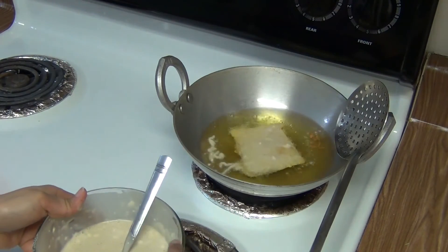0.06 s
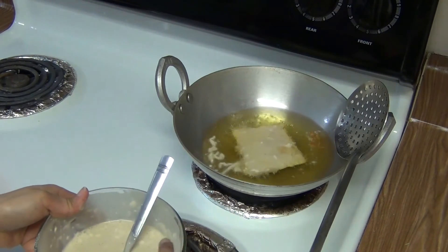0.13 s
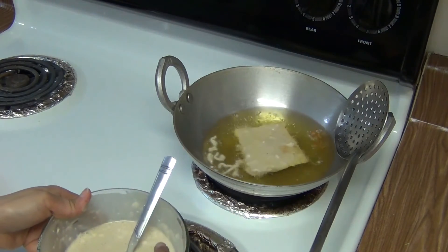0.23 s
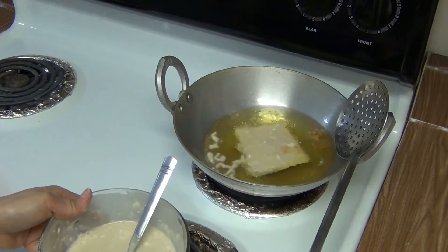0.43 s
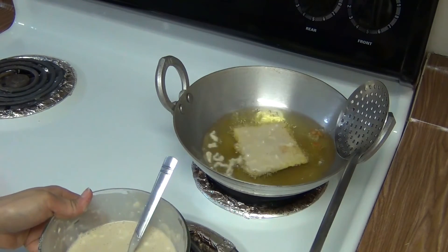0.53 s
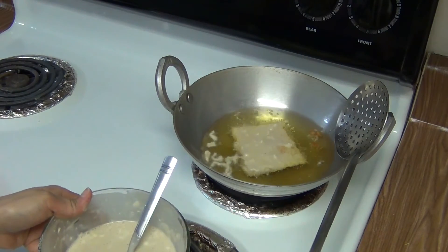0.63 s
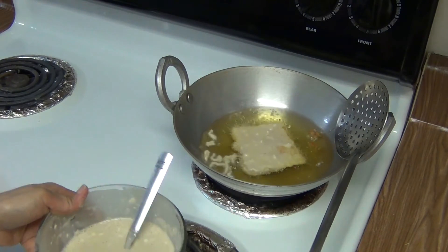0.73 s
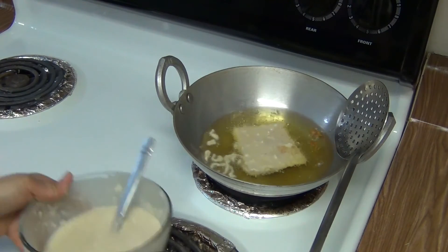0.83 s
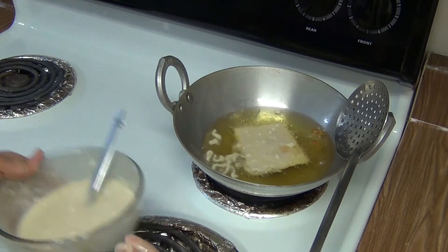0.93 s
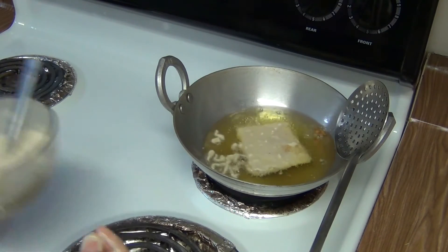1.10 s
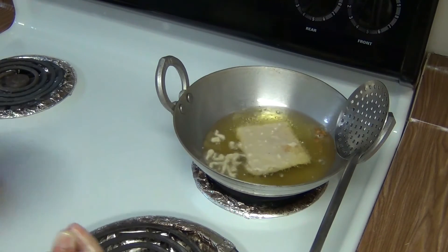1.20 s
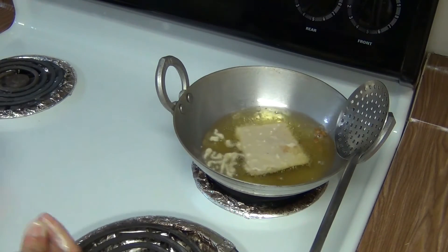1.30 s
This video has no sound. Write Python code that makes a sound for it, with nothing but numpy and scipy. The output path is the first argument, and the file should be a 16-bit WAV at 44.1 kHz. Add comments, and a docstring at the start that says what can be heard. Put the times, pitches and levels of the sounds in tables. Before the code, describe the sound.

In a small kitchen, hot oil fizzes and bubbles softly around frying food near the microphone. A utensil clatters quickly against a dish, louder than the oil, then the sizzle continues with faint bumps and one sharper pop.

```python
"""A thin fizz of bursting bubbles over a low, simmering rumble: battered food is frying in hot oil.
Bigger bubbles spit, steam gurgles out from under the food, and handling makes faint bumps.
Early on, a utensil knocks and rattles against a dish, and the dish and the small kitchen ring.
A noise suppressor turns the middle pitches down whenever they are quiet."""
import sys
import numpy as np
from scipy.fft import rfft, irfft
from scipy.io import wavfile
from scipy.ndimage import uniform_filter1d

SR = 44100
rng = np.random.default_rng(int(sys.argv[2]) if len(sys.argv) > 2 else 0)


def store_wav(level_fs):
    """Save 16-bit WAV to argv[1]."""
    pcm = np.round(np.clip(np.atleast_2d(level_fs), -1, 1) * 32767)
    wavfile.write(sys.argv[1], SR, pcm.T.astype(np.int16))


N = 59535
T = np.arange(N) / SR
HZ = np.maximum(np.arange(N + 1) * SR / (2 * N), 1)

# Levels in dB are relative: later gains shift them. A fade time (T60) is the time to drop 60 dB.
# How hard the oil fizzes. Each row: time in seconds, level in dB.
SIZZLE_LEVEL = [(0, -48), (.13, -48.5), (.21, -45.5), (.55, -51), (.72, -50), (1.03, -50), (1.12, -46.5),
                (1.35, -45.5)]
# Tone of bursting bubbles. Each row: frequency in Hz, level in dB.
BUBBLE_TONE = [(4400, -60), (5100, -23), (5450, -24), (6250, -9), (7000, -5), (7900, 0), (8800, -6),
               (9500, -16), (10200, -16), (10900, -36), (12300, -50.5), (14000, -69.5)]
# How strongly the oil rumbles. Each row: time in seconds, level in dB.
SIMMER_LEVEL = [(0, -58), (.12, -55.5), (.2, -59.5), (.56, -55), (.6, -55.5), (.64, -55), (.68, -62),
                (.735, -58.5), (.8, -60.5), (.88, -57.5), (1.09, -57), (1.22, -54.5), (1.35, -53.5)]
# Tone of that rumble. Each row: frequency in Hz, level in dB.
SIMMER_TONE = [(25, -27.5), (70, -19.5), (120, -9), (170, -12), (230, -2.5), (310, -3.5), (380, -2),
               (470, -1.5), (650, -9.5), (820, -15), (1050, -22.5), (1500, -30), (2200, -50)]
# Louder spits of oil. Each row: start in seconds, level in dB, pitch in Hz.
SPITS = [(.0125, -37, 7520), (0.0432, -34, 7160), (0.1543, -28, 7800), (.176, -33.5, 9030),
         (.4705, -32, 8000), (.799, -33.5, 7800), (1.0857, -19, 8250), (1.0906, -29, 8392),
         (1.1997, -34, 7900)]
# Gurgles in the hollow of the pan. Each row: loudest moment in seconds, level in dB, pitch in Hz.
GURGLES = [(0.12, -52.5, 313.4), (.49, -52, 314.4), (.64, -53.5, 302), (.865, -55, 328), (.975, -52.5, 318),
           (1.05, -56, 320), (1.195, -50, 307.5), (1.254, -50, 298)]
# Soft bumps. Each row: start in seconds, thud level in dB, tap level in dB.
BUMPS = [(.165, -54, -68), (.618, -70, -84.5), (.852, -54, -79), (.895, -60.5, -54.5), (1.191, -59, -71.5),
         (1.315, -69, -54.5)]
# Tones of a bump's thud and tap. Each row: frequency in Hz, level in dB.
THUD_TONE = [(25, -6.5), (70, -9.5), (125, 4.5), (200, -16.5), (500, -27.5), (1500, -63)]
TAP_TONE = [(100, -26.5), (400, 2), (900, 2.5), (1300, -5), (2200, -22.5), (5000, -57.5)]
# Utensil hits. Each row: start in seconds, crack level in dB, ring level in dB, crack hold in seconds.
KNOCKS = [(0.2367, -20, -36, 0.0059), (0.2485, -18, -34, 0.0043), (0.2556, -19, -36, 0.0051),
          (0.2791, -17, -32.5, 0.006), (.3608, -32.5, -37.5, 0.0036), (0.401, -43, -44, 0.0046)]
# Tones of a hit's crack and of the dense ringing after it. Each row: frequency in Hz, level in dB.
CRACK_TONE = [(40, -28), (200, -15), (400, -10), (650, -8.5), (900, -4), (1300, -15.5), (2500, -21),
              (4700, -16), (6200, -6.5), (8000, 3), (8900, -2.5), (9500, -10.5), (10100, -9.5),
              (10800, -25.5), (12300, -26.5), (13000, -55), (15500, -64.5)]
ROOM_RING_TONE = [(30, -19), (120, -2.5), (250, -2), (450, -2), (900, 1), (1250, -0.5), (1900, 4),
                  (3000, 2.5), (5000, -3), (7800, 2), (9800, -9), (11000, -21.5), (12500, -26.5),
                  (15000, -45)]
# The dish's own notes. Each row: pitch in Hz, level in dB, fade time in seconds.
DISH_NOTES = [(376, -2, 0.29), (516, 2.5, 0.25), (850, -6, 0.26), (1850, 1.5, 0.32), (2236, -11, 0.3),
              (2256, -12, 0.32), (2415, -7.5, 0.34), (2547, -4.5, 0.25), (2714, -9, .5), (3430, -15, .5),
              (3952, -10, 0.495), (4335, -14.5, 0.493), (5530, -8, 0.326), (5880, -3, 0.24),
              (6310, -7, 0.36), (6984, -2.5, 0.24), (7386, 4, .28), (7920, -6, .4), (8770, -3.5, 0.296),
              (8490, -11, .25)]
# How long the kitchen echoes. Each row: frequency in Hz, fade time in seconds.
KITCHEN_FADE = [(60, 0.86), (250, 0.58), (600, .55), (2500, 0.4), (8000, 0.44), (14000, 0.33)]
# Stereo width. Each row: frequency in Hz, level of the sides against the middle in dB.
STEREO_WIDTH = [(30, -7.5), (70, -8.5), (140, -11.5), (300, -17.5), (700, -19), (1500, -21.5),
                (3500, -23.5), (5500, -12.5), (7000, -15), (8500, -17.5), (11000, -37)]
# Added lean to the left. Each row: frequency in Hz, left level against right in dB.
LEFT_LEAN = [(30, -2.5), (80, 10.5), (150, 9), (300, 3), (600, -2), (1500, -0.7), (12000, -0.25)]
# The suppressor's deepest cut. Each row: frequency in Hz, gain in dB.
DEEPEST_CUT = [(800, -1), (1300, -20), (1850, -29), (4400, -43), (4900, -27.5), (5350, -0.5)]
# Tone of a very faint hiss. Each row: frequency in Hz, level in dB.
HISS_TONE = [(1000, -0.5), (5000, 4), (10000, -7.5), (13000, -16)]


def from_db(db):
    """Turn decibels into a number to multiply by."""
    return 10 ** (np.asarray(db) / 20)


def unit_power(x):
    """Scale a signal to an average power of 1."""
    return x / np.sqrt(np.mean(x ** 2) + 1e-20)


def over_time(rows):
    """Join (time, value) rows with straight lines."""
    return np.interp(T, *np.transpose(rows))


def at_hz(rows, hz):
    """Read between (frequency, value) rows, with octaves evenly spaced."""
    frequencies, values = np.transpose(rows)
    return np.interp(np.log(hz), np.log(frequencies), values)


def filtered(x, response):
    """Turn each frequency up or down."""
    return irfft(rfft(x, 2 * N) * response)[..., :N]


def with_tone(x, tone):
    """Shape a sound with a tone table; white noise keeps its power."""
    cepstrum = irfft(np.log(unit_power(from_db(at_hz(tone, HZ)))))
    # Minimum phase: the filter rings only after a sound, never before it.
    cepstrum[1:N] *= 2
    cepstrum[N + 1:] = 0
    return filtered(x, np.exp(rfft(cepstrum)))


def drift(rate_hz):
    """A smooth random wobble, about 1 in size."""
    return unit_power(filtered(rng.standard_normal(N), 1 / (1 + (HZ / rate_hz) ** 2)))


def pan(left_db):
    """Left and right gains; negative values move the sound right."""
    return from_db(np.array([[.5], [-.5]]) * left_db)


def stereo(pair):
    """Use two unrelated signals as the middle and sides of a narrow stereo sound."""
    side = filtered(pair[1], from_db(at_hz(STEREO_WIDTH, HZ)))
    return np.array([pair[0] + side, pair[0] - side])


def kitchen_echo():
    """Many reflections blur together, each octave fading at its own rate."""
    noise, echo = rng.standard_normal((2, N)), 0
    for hz in 2. ** np.arange(5, 15):
        octave = filtered(noise, np.maximum(1 - abs(np.log2(HZ / hz)), 0))
        echo += octave * from_db(-60 * T / at_hz(KITCHEN_FADE, hz))
    return stereo(echo)


def in_kitchen(x, echo_db):
    """The direct sound plus the room's echo."""
    echo = unit_power(kitchen_echo()) / np.sqrt(N)
    return x + from_db(echo_db) * filtered(x, rfft(echo, 2 * N))


def sizzle(bursts_per_s=6400, spread_db=3.5, flutter_db=0.63):
    """Thousands of tiny steam bubbles burst at random, most weak and a few strong."""
    sizes = from_db(spread_db * np.minimum(rng.exponential(1, (2, N)), 5))
    signs = rng.choice([-1, 1], (2, N))
    bursting = rng.random((2, N)) < bursts_per_s / SR
    bursts = stereo(with_tone(sizes * signs * bursting, BUBBLE_TONE))
    fizz = unit_power(in_kitchen(bursts, echo_db=-7))
    return fizz * from_db(over_time(SIZZLE_LEVEL) + flutter_db * drift(23))


def simmer(boost_db=1.5, flutter_db=0.5):
    """Churning oil makes a low, uneven rumble."""
    rumble = unit_power(stereo(with_tone(rng.standard_normal((2, N)), SIMMER_TONE)))
    return rumble * from_db(boost_db + over_time(SIMMER_LEVEL) + flutter_db * drift(18))


def spits(rise_s=0.00027):
    """Bigger bubbles pop, each with a ping about a millisecond long."""
    pops = 0
    for start, db, hz in SPITS:
        age = np.maximum(T - start, 0)
        shape = (age / rise_s) ** 2 * np.exp(-age / rise_s)
        ping = with_tone(shape * np.sin(2 * np.pi * hz * age), BUBBLE_TONE)
        pops += from_db(db) * ping / abs(ping).max()
    return in_kitchen(pops, echo_db=-16)


def gurgles(width_s=.024, wobble_radians=0.44):
    """Steam escapes from under the food in short, hollow swells."""
    steam = 0
    for peak_time, db, hz in GURGLES:
        phase = 2 * np.pi * (hz * T + rng.random()) + wobble_radians * drift(60)
        swell = np.exp(-((T - peak_time) / width_s) ** 2)
        steam += from_db(db) * swell * np.sqrt(2) * np.sin(phase)
    return steam


def bumps(rise_s=.005, fade_s=0.27):
    """Handling makes faint bumps, each a low thud and a dull tap."""
    thuds, taps = 0, 0
    for start, thud_db, tap_db in BUMPS:
        age = np.maximum(T - start, 0)
        shape = (1 - np.exp(-age / rise_s)) * from_db(-60 * age / fade_s)
        thuds += from_db(thud_db) * shape
        taps += from_db(tap_db) * shape
    thud_sound = with_tone(thuds * rng.standard_normal(N), THUD_TONE)
    return thud_sound + with_tone(taps * rng.standard_normal(N), TAP_TONE)


def utensil_knocks(crack_fade_s=0.054, ring_rise_s=0.028, room_boost_db=6.5):
    """The utensil bounces on the dish: each hit cracks, then the room and the dish ring on."""
    cracks, room, swells = 0, 0, []
    for start, crack_db, ring_db, hold_s in KNOCKS:
        age = np.maximum(T - start, 0)
        shape = (T > start) * from_db(crack_db - 60 * np.maximum(age - hold_s, 0) / crack_fade_s)
        cracks += shape * stereo(rng.standard_normal((2, N)))
        swell = from_db(ring_db) * (1 - np.exp(-age / ring_rise_s))
        room += swell * np.roll(kitchen_echo(), int(start * SR), axis=1)
        swells.append((age, swell))
    dish = dish_ring(swells)
    cracks = in_kitchen(with_tone(cracks, CRACK_TONE), echo_db=-10)
    return cracks + from_db(room_boost_db) * with_tone(room, ROOM_RING_TONE) + dish


def dish_ring(swells, waver_db=4.5, waver_radians=0.31):
    """Every hit adds energy to the dish's notes, which waver as they fade."""
    ring = 0
    for hz, db, fade_s in DISH_NOTES:
        energy = sum((swell * from_db(-60 * age / fade_s)) ** 2 for age, swell in swells)
        note = np.sin(2 * np.pi * hz * T + waver_radians * drift(25))
        ring += np.sqrt(energy) * from_db(db + waver_db * drift(20)) * note
    return ring


def noise_suppressor(x, low_hz=1092, high_hz=5014, threshold_db=-41, cut_slope=1.48):
    """The further the middle pitches fall below the threshold, the more they are turned down."""
    middle_band = 1 / (1 + (low_hz / HZ) ** 16) / (1 + (HZ / high_hz) ** 60)
    power = np.mean(filtered(x, middle_band) ** 2, axis=0)
    smooth_power = uniform_filter1d(power, size=900)  # about 20 milliseconds
    below_db = np.maximum(threshold_db - 10 * np.log10(abs(smooth_power) + 1e-18), 0)
    fully_cut = filtered(x, from_db(at_hz(DEEPEST_CUT, HZ)))
    return fully_cut + (x - fully_cut) * from_db(-cut_slope * below_db)


def scene():
    """The oil sits a little to the right, the knocks near the middle, and the bass leans left."""
    high_oil = (sizzle() + spits()) * pan(left_db=-3)
    low_oil = (simmer() + gurgles()) * pan(left_db=-5.5)
    mix = high_oil + low_oil + bumps() + utensil_knocks()
    return filtered(mix, pan(at_hz(LEFT_LEAN, HZ)))


def record(dry):
    """Run the suppressor, add a very faint hiss and cut off the highest treble."""
    hiss_db, cutoff_hz = -99, 15450
    hiss = from_db(hiss_db) * with_tone(rng.standard_normal(N), HISS_TONE)
    return filtered(noise_suppressor(dry) + hiss, 1 / (1 + (HZ / cutoff_hz) ** 400))


dry = scene()
out = record(dry)
store_wav(out)
```